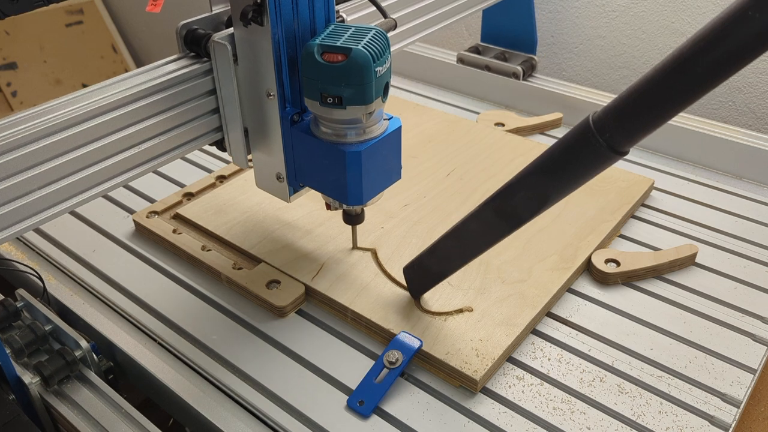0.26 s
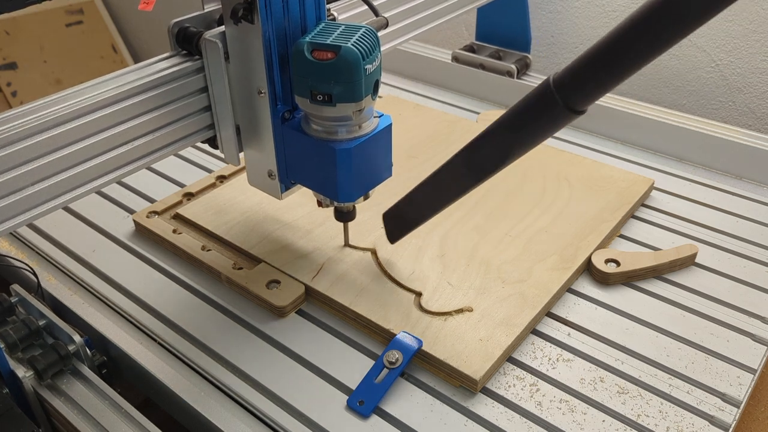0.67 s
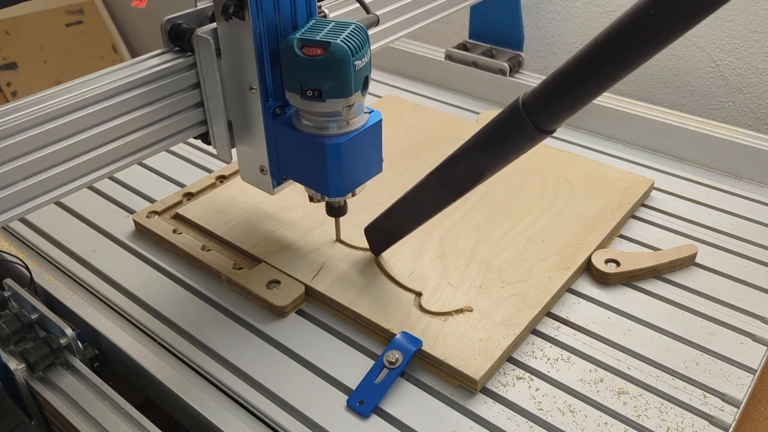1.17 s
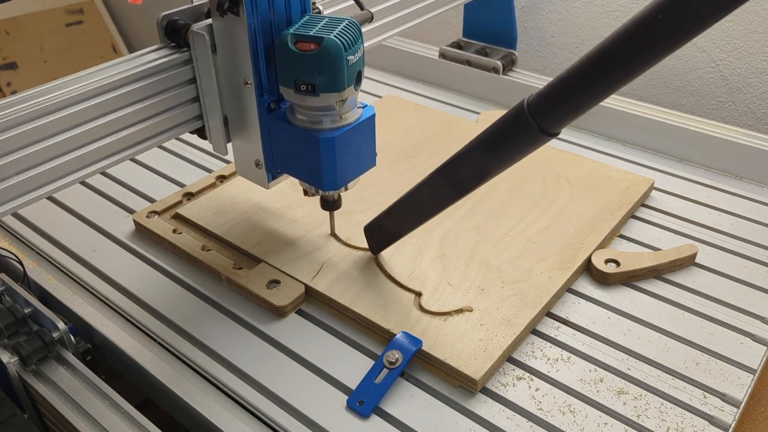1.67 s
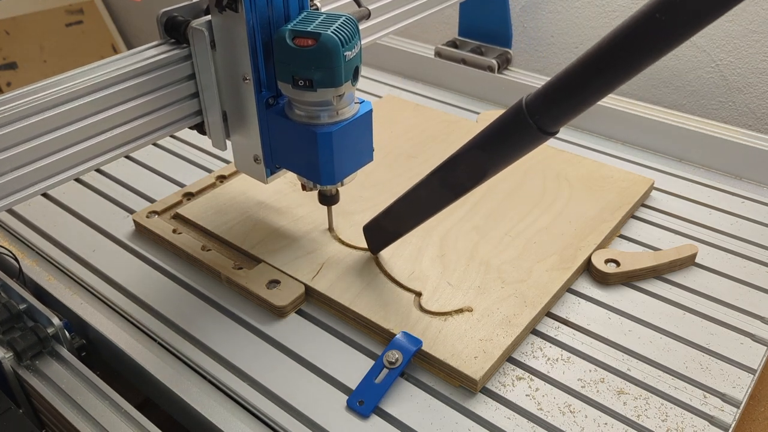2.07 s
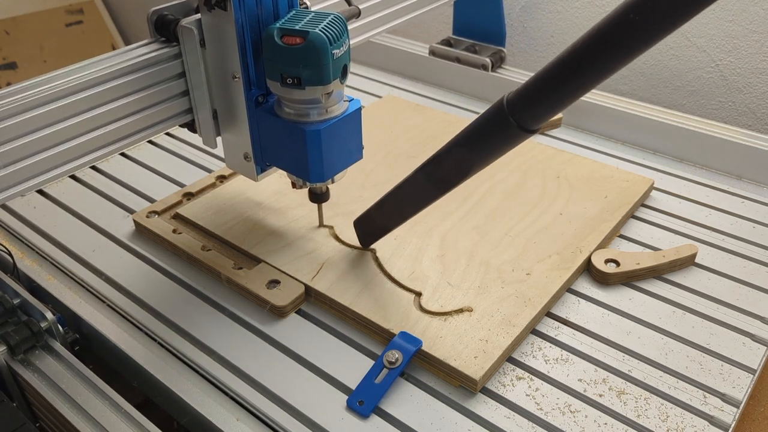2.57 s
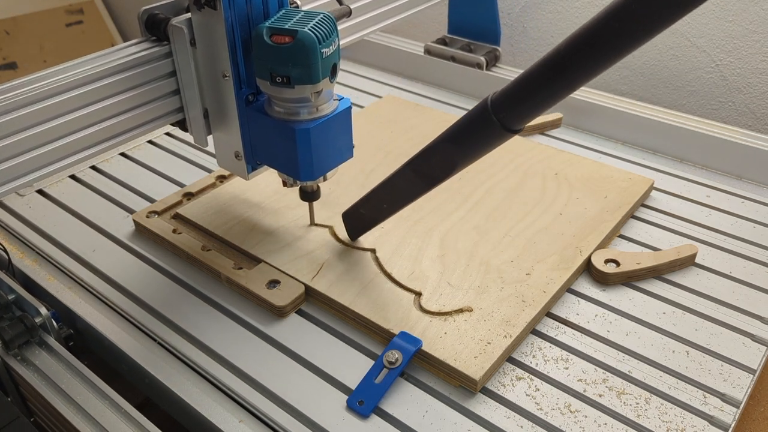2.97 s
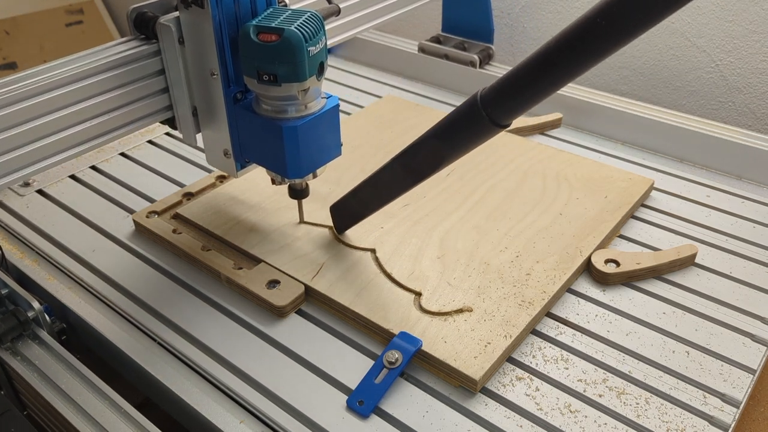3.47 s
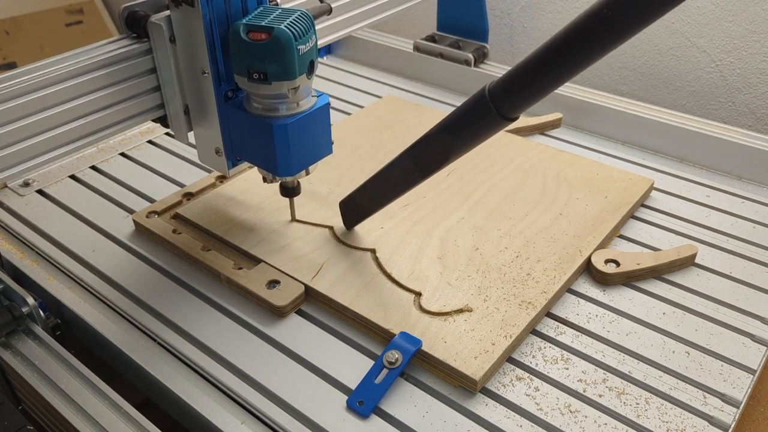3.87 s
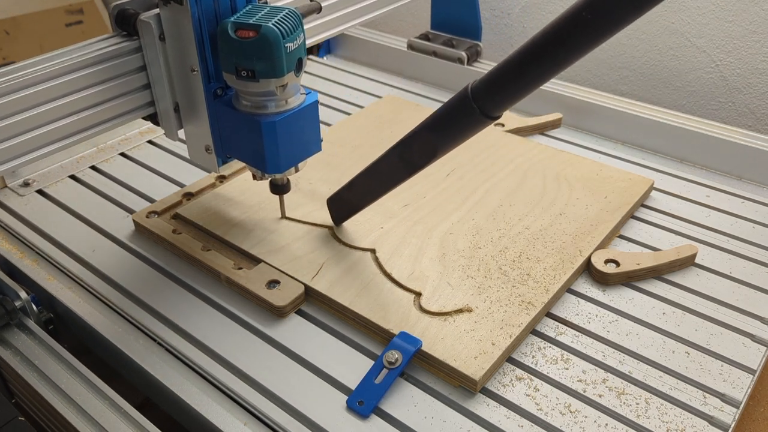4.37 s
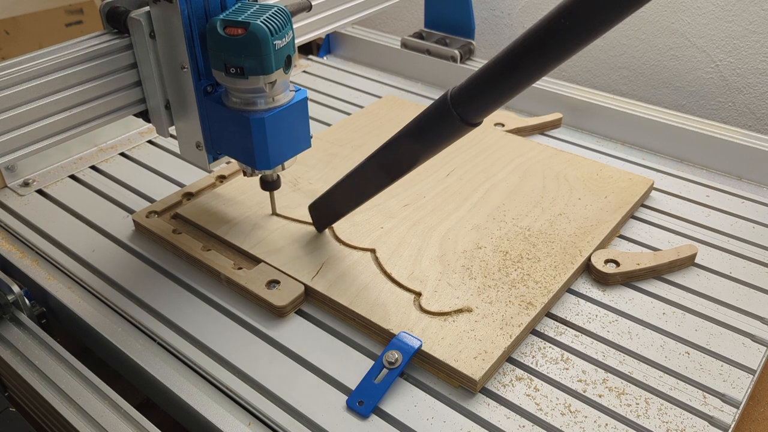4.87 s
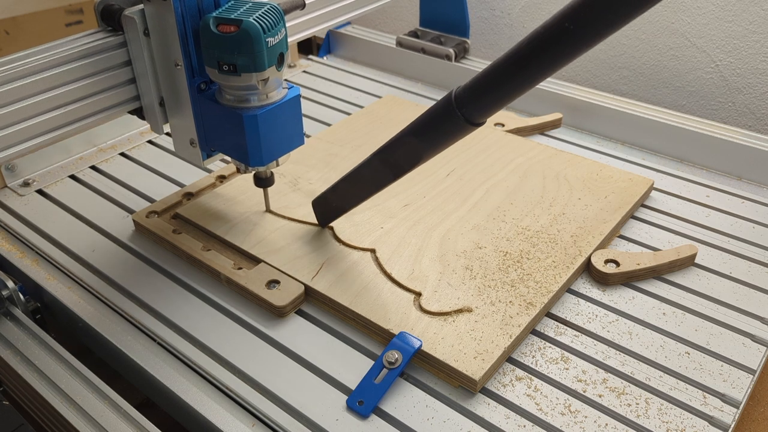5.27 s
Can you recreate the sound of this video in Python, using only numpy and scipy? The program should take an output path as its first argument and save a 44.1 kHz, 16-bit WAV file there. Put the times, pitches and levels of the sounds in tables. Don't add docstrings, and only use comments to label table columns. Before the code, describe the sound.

Close, continuous milling noise: a piercing high bit whine over a buzzing cutter tone, airy suction hiss, gliding motor hum and roughness at a corner.

```python
import sys
import numpy as np
from scipy import signal
from scipy.fft import rfft, irfft, next_fast_len
from scipy.io import wavfile
from scipy.ndimage import uniform_filter1d, map_coordinates

SR = 44100
rng = np.random.default_rng(int(sys.argv[2]) if len(sys.argv) > 2 else 0)


def persist_wave(psi):
    counts = np.round(np.clip(psi, -1, 1) * 32767).astype(np.int16)
    wavfile.write(sys.argv[1], SR, np.atleast_2d(counts).T)


def decibels_to_gain(level_db):
    exponent = np.asarray(level_db, float) / 20
    return 10 ** exponent


N = 243873


def router():
    ring_hz, = curves(CHATTER_PITCH)
    grab_db = grabs()
    shudder, looseness = gantry_shudder()
    grain = np.array([wobble(350), wobble(350)])
    rate_hz = 966.6 - 0.008 * (5600 - ring_hz)
    flute = turning(rate_hz + 0.25 * wobble(30.1))
    left_db, right_db = (db + grab_db for db in curves(CHATTER_LEVEL))
    strong_db = 10 * np.log10((decibels_to_gain(2 * left_db) + decibels_to_gain(2 * right_db)) / 2)
    strikes = flute_strikes(flute, shudder, grain, grab_db)
    ring = turning(ring_hz + (65 + 130 * looseness) * shudder[0] + wobble(30))
    chatter = bit_chatter(ring, left_db, right_db, shudder, grain)
    mixed = mixing_tones(flute, ring, strong_db, shudder + 0.072 * grain)
    return strikes + chatter + mixed + chip_noise(flute, shudder) + bit_hiss(strong_db)


# level at start in dB, drift
# in dB per s, swing in dB, loudest moment in seconds, period in seconds.
STRIKE_LEVEL = [(-21, -1.13, 0.9, 3, 4), (-26.5, -1.08, 3, 2.45, 4.1), (-19.5, -2, 3, 2.3, 4.9),
                (-30, 0.96, 1.5, 1.73, 2.17)]
# balance at start in dB, drift in dB per s, swing in dB,
# most left moment in seconds, period in seconds.
STRIKE_PAN = [(6.5, -0.53, 3, 3.2, 3.6), (-4, 2.53, 6, 5.76, 5.9), (1.5, -3, -0.5, 3.85, 1.85)]
# lead at start in rad, drift in rad per s, swing in rad,
# most ahead moment in seconds, period in seconds.
STRIKE_LEAD = [(-0.76, 0.33, 0.76, 3, 4.5), (-2.14, -0.15, 0.12, 4.3, 2.85),
               (-1.72, -0.23, 0.18, 0.97, 1.9)]
# level in dB, left-right in dB, left lead in rad,
# loudest moment in seconds, period in seconds.
UPPER_ORDERS = [(-40, -2.6, -.4, 1.5, 3.6), (-32.5, -1.7, 1.6, 1.75, 3.3), (-40, 2.7, 2.5, 4.1, 11),
                (-32.5, 2.1, 2, 1.45, 3.2), (-53.3, 7, 3, 1.6, 4.5), (-37.5, -.7, -1.9, 1.8, 5),
                (-43.3, 4.4, 3.1, 2.1, 5), (-36.6, 2.8, -1.1, 4, 7), (-41, 6.6, 2.6, 2.05, 4.5),
                (-40, 1.7, 0, 1.3, 3), (-46.5, 4.9, -.2, 1.45, 4), (-48.2, .7, -.1, 1.8, 2.6)]


def flute_strikes(flute, shudder, grain, grab_db):
    order_db = [slide(*row) for row in STRIKE_LEVEL]
    order_db[1] = order_db[1] - 1.1 * grab_db
    tones = shaken(flute, order_db[0], -0.47, 0, 0.25 * shudder + 0.098 * grain)
    shudder_share = [1.05, .55, .3]
    for k, share in enumerate(shudder_share):
        level_db = order_db[k + 1] + 0.74 * wobble(8.9)
        pan_db, lead = slide(*STRIKE_PAN[k]), slide(*STRIKE_LEAD[k])
        tones = tones + shaken((k + 2) * flute, level_db, pan_db, lead, share * shudder + 0.1 * grain)
    return tones + family(range(5, 17), UPPER_ORDERS, flute, 0, 0, shudder + 0.072 * grain)


# time in seconds, left level in dB, right level in dB.
CHATTER_LEVEL = [(0, -27, -18), (.4, -23.5, -16.5), (.62, -19, -17), (.92, -17.5, -21), (1.08, -24, -17.5),
                 (1.35, -22, -17.5), (1.47, -33, -19), (1.75, -42, -20), (2.15, -29, -22),
                 (2.7, -20.5, -21), (2.9, -23, -17), (3.15, -18.5, -19.5), (3.7, -19, -18.5),
                 (4.1, -21, -15.5), (4.7, -34, -15), (5.1, -41, -13), (5.25, -22, -16), (5.53, -22.5, -22)]
# time in seconds, pitch in Hz.
CHATTER_PITCH = [(0, 5597), (.45, 5613), (.92, 5610), (1.1, 5598), (1.36, 5595), (1.46, 5512), (2.1, 5535),
                 (2.5, 5565), (2.8, 5562), (3.15, 5582), (4.1, 5592), (5.53, 5595)]


def bit_chatter(ring, left_db, right_db, shudder, grain):
    turned = np.clip((np.arange(N) / SR - 1.73) / .4 + .5, 0, 1)
    lead = .2 + (4.15 - .2) * turned
    tremor = 1.15 * shudder + 0.11 * grain
    return shaken(ring, (left_db + right_db) / 2 - .6, left_db - right_db, lead, tremor)


# level in dB under the chatter,
# left-right in dB, left lead in rad, loudest moment in seconds, period in seconds.
CHATTER_SIDEBANDS = [(-17.5, -6, 0.84, 0.76, 7.4), (-24, 1.3, -3.5, .45, 7.8), (-17.5, 5, -1.5, 1.4, 6.5),
                     (-12, -1, 4.5, 1.3, 5.1), (-11, 2, 1, 3.5, 4.6), (-14.5, 2.5, -1.54, 0.16, 4.27),
                     (-15, 3, 4, 3.86, 4.8), (-21, 6, 1.5, 1.65, 2.5), (-39, 5.5, -0.5, 2.6, 2),
                     (-13, 3, 2.5, 0.65, 4.1), (-21, 8.6, 6, 1.1, 4.5), (-37.4, 3.3, -6, .95, 6),
                     (-15, 8.7, -3, 1.9, 3.3)]
# level in dB, left-right in dB,
# left lead in rad, loudest moment in seconds, period in seconds.
DOUBLED_SIDEBANDS = [(-44, 6, -6, 1.5, 4.5), (-26.6, -11, 5, .1, 3), (-33, 0, -1.5, 1.05, 4),
                     (-36, 1, -1, 10.3, 11), (-14.5, 5, -1.5, 1.8, 5.3), (-19, -8, 3.5, 1.3, 7)]


def mixing_tones(flute, ring, strong_db, tremor):
    gain_db = -0.56
    orders = [-3, -2, -1, *range(1, 11)]
    around = family(orders, CHATTER_SIDEBANDS, flute, ring, strong_db + gain_db, tremor)
    doubled_db = 2 * strong_db + 20 + gain_db
    return around + family(range(-2, 4), DOUBLED_SIDEBANDS, flute, 2 * ring, doubled_db, tremor)


# middle in seconds, level change in dB, half length in seconds.
CORNER_GRABS = [
    (2.17, -4, .025),
    (2.235, 6, .025),
    (2.4, -4, .11),
    (2.53, 6, .025),
    (2.6, -4, .025),
    (2.66, 4, .015),
    (2.71, -4, .025),
]


def grabs():
    return sum(db * bump(s, half_s) for s, db, half_s in CORNER_GRABS)


# time in seconds, rate in Hz, regular share 0-1, depth on flute orders 0-1.
GANTRY_SHAKE = [(0, 30, .4, .16), (.35, 30, .4, .12), (.45, 30, .3, .04), (1.35, 30, .3, .06),
                (1.5, 30, .4, .15), (1.85, 30, .3, .24), (2.7, 29, .4, .3), (2.95, 30, .85, .34),
                (3.4, 30.5, .9, .32), (3.75, 34, .97, .3), (4.13, 34.5, .97, .28), (4.2, 34, .6, .05),
                (5.53, 34, .5, .04)]


def gantry_shudder():
    shake_hz, regular, depth = curves(GANTRY_SHAKE)
    regular = np.clip(regular, 0, 1)
    beat = turning(shake_hz + wobble(4.7))
    shake = np.array([np.sqrt(2 * regular) * wave(beat) + np.sqrt(1 - regular) * wobble(45)
                      for wave in (np.sin, np.cos)])
    return depth * shake, 1 - regular


# frequency in Hz, level in dB per Hz.
CHIP_COLOUR = [(300, -48), (900, -1.5), (2000, -3), (4300, 7), (5600, 2.5), (9000, -3), (13000, 0),
               (16000, -6.5)]
# time in seconds, level in dB.
CHIP_LEVEL = [
    (0.0, -29.5),
    (0.61, -53),
    (1.91, -29.5),
    (5.14, -39),
    (5.53, -32.5),
]


def chip_noise(flute, shudder):
    chips = stereo_noise(lambda hz: decibels_to_gain(along(CHIP_COLOUR, hz)), patchy_db=2.0)
    chips = chips * (1 + 0.34 * np.sin(flute)) * (1 + 1.3 * shudder[0])
    return decibels_to_gain(curves(CHIP_LEVEL)[0] + 10) * chips


def bit_hiss(strong_db):
    centre_hz, width_hz = 5550, 420
    resonance = lambda hz: 1 / (1 + ((hz - centre_hz) / width_hz) ** 2)
    return decibels_to_gain(strong_db - 13) * stereo_noise(resonance, patchy_db=2)


# time in seconds, pitch in Hz, level in dB.
FIRST_AXIS = [(0, 242.7, -51), (.2, 255, -34), (.45, 262, -55), (.65, 265, -39), (1, 266.8, -48.5),
              (1.45, 250.2, -37), (1.7, 236.8, -42), (1.95, 215, -38), (2.15, 178, -49)]
SECOND_AXIS = [(2.15, 238.7, -43), (2.499, 244.4, -40.5), (3, 249, -35.5), (3.6, 255.9, -35.5),
               (4, 259, -43), (4.5, 261.6, -41.5), (4.8, 264.7, -49), (5.53, 265.5, -52)]
RISING_AXIS = [
    (1.65, 245, -56),
    (1.9, 295, -49),
    (2.15, 350, -52),
]


def steppers():
    t, out = np.arange(N) / SR, 0
    for rows in (FIRST_AXIS, SECOND_AXIS, RISING_AXIS):
        hz, db = curves(rows)
        on = np.clip(np.minimum(t - rows[0][0], rows[-1][0] - t) / 0.043 + .5, 0, 1)
        hum = pair(turning(hz), db + 1.4 * wobble(12), 2.5, 0)
        octave = pair(2 * turning(hz), db - 18, 0, 0)
        microsteps = pair(16 * turning(hz), -44 + 3 * wobble(3), -1.5, 1.5)
        out = out + on * (hum + octave + microsteps)
    return out


# frequency in Hz, level in dB per Hz.
HOSE_COLOUR = [(20, -55), (60, -37), (80, -20), (110, -4.5), (420, -10.5), (800, -2.5), (1150, -5),
               (2000, -3), (3300, 5.5), (3550, 5), (5000, -4.5), (7000, 1.5), (10500, -4.5), (13000, 1),
               (16000, -4.5)]
# time in seconds, level in dB.
HOSE_LEVEL = [
    (0.0, -25),
    (1.56, -21.5),
    (2.97, -24.5),
    (3.22, -23.5),
    (5.53, -24.5),
]


def hose_rush():
    level_db = curves(HOSE_LEVEL)[0] + 4.5 + 0.43 * wobble(14)
    return decibels_to_gain(level_db) * stereo_noise(lambda hz: decibels_to_gain(along(HOSE_COLOUR, hz)), patchy_db=1.5)


# pitch in Hz, level in dB.
MOTOR_LINE = (1023, -42)


def vacuum_motor():
    hz, db = MOTOR_LINE
    return pair(turning(hz + 0.64 * wobble(9.1)), db + 0.78 * wobble(5.0), 0, 0)


# frequency in Hz, width in Hz, level in dB.
ROOM_MODES = [(141, 15.5, 0.5), (178, 12.7, 4), (202.4, 21, 2.5), (248, 45, -6), (349, 22, -7.5)]
# time in seconds, rise in dB.
RUMBLE_SURGES = [(.28, 12.5), (1.44, 14), (2.2, 8), (3.47, 13), (3.75, 11), (4.89, 13.5), (5.03, 6),
                 (5.31, 6)]


def room_rumble():
    modes = lambda f: np.sqrt(sum(decibels_to_gain(2 * db) / (1 + (2 * (f - c) / w) ** 2) ** 2 for c, w, db in ROOM_MODES))
    surge_db = sum(db * bump(s, 0.046) for s, db in RUMBLE_SURGES)
    drone = pair(turning(101 + 2.43 * wobble(8)), -50.5 + surge_db + 3 * wobble(7), -.5, 0)
    return decibels_to_gain(-39) * stereo_noise(modes, patchy_db=0.0) + drone


# frequency in Hz, correlation -1 to 1.
LIKENESS = [(60, 0.39), (130, 1), (400, 0.8), (900, 0.78), (2000, 0.71), (2800, -0.11), (4000, -0.1),
            (15000, -0.0022)]
# frequency in Hz, left-right in dB.
NOISE_LEAN = [(100, 0.5), (2000, 0.5), (5000, -2.5), (10500, 1), (12500, 6), (16000, 6)]


def stereo_noise(gain, patchy_db):
    z = signal.stft(rng.standard_normal((2, N)), nperseg=512)[2]
    room_ripple_db = 2.2 * patches(z.shape[1:], 2, 250)
    field_db = patchy_db * patches(z.shape[1:], 5, 12) + room_ripple_db
    two = signal.istft(z * decibels_to_gain(field_db), nperseg=512)[1][:, :N]
    turn = lambda hz: np.arccos(np.clip(along(LIKENESS, hz), -1, 1)) / 2
    mid, side = filtered(two, lambda hz: gain(hz) * [np.cos(turn(hz)), np.sin(turn(hz))])
    lean = lambda hz: decibels_to_gain(along(NOISE_LEAN, hz) * [[.5], [-.5]])
    return unit(filtered(np.array([mid + side, mid - side]), lean))


def family(orders, rows, flute, carrier, base_db, tremor):
    out = 0
    for order, (db, pan_db, lead, top_s, period) in zip(orders, rows):
        apart = 0.043 * period * rng.standard_normal()
        left_db, right_db = (slide(0, 0, 4.5, top_s + way * apart, period) for way in (1, -1))
        level_db = base_db + db + (left_db + right_db) / 2 + 1.1 * wobble(5.5)
        balance_db = pan_db + left_db - right_db + 1.7 * wobble(2.67)
        phase = carrier + order * flute + rng.uniform(0, 2 * np.pi)
        out = out + shaken(phase, level_db, balance_db, lead + 0.35 * wobble(1.32), tremor)
    return out


def shaken(phase, db, pan_db, lead, tremor):
    angle = rng.uniform(0, 2 * np.pi) + np.array([[0], [rng.normal(0, 1.0)]])
    size = 1 + np.cos(angle) * tremor[0] + np.sin(angle) * tremor[1]
    twist = 0.53 * (np.cos(angle) * tremor[1] - np.sin(angle) * tremor[0])
    left_right = np.array([[.5], [-.5]])
    level = np.sqrt(2) * size * decibels_to_gain(db + left_right * pan_db)
    return level * np.sin(phase + twist + left_right * lead)


def pair(phase, db, pan_db, lead):
    left = decibels_to_gain(db + pan_db / 2) * np.sin(phase + lead / 2)
    right = decibels_to_gain(db - pan_db / 2) * np.sin(phase - lead / 2)
    return np.sqrt(2) * np.array([left, right])


def unit(x):
    return x / np.sqrt(np.mean(x ** 2) + 1e-20)


def along(points, hz):
    f, v = np.transpose(points)
    return np.interp(np.log(hz + 1), np.log(f + 1), v)


def curves(rows):
    s, *cols = np.transpose(rows)
    return [np.interp(np.arange(N) / SR, s, c) for c in cols]


def wobble(rate):
    knots = rng.standard_normal(int(N * rate / SR) + 4)
    return map_coordinates(knots, [np.arange(N) * rate / SR])


def turning(hz):
    return 2 * np.pi * np.cumsum(hz) / SR * np.ones(N) if np.ndim(hz) == 0 else 2 * np.pi * np.cumsum(hz) / SR


def filtered(x, response):
    m = next_fast_len(N + 8192)
    return irfft(rfft(x, m) * response(np.fft.rfftfreq(m, 1 / SR)), m)[..., :N]


def patches(shape, bins, frames):
    smooth = uniform_filter1d(rng.standard_normal(shape), bins, axis=0)
    return unit(uniform_filter1d(smooth, frames, axis=1))


def slide(start, per_s, swing, top_s, period_s):
    t = np.arange(N) / SR
    return start + per_s * t + swing * np.cos(2 * np.pi * (t - top_s) / period_s)


def bump(s, half_s):
    return np.exp(-((np.arange(N) / SR - s) / half_s) ** 2)


def scene():
    return router() + steppers() + hose_rush() + vacuum_motor() + room_rumble()


def band_limit(x):
    return signal.sosfilt(signal.butter(12, 15750, fs=SR, output="sos"), x)


# centre in Hz, width in Hz, share removed 0-1.
SPECTRUM_HOLLOWS = [(1150, 80, .7), (3500, 150, .85), (4360, 120, .5), (6260, 70, .4)]
# centre in Hz, half width in Hz, leak 0-1.
PORT_NOTCH = (8220, 150, .06)


def record(dry):
    centre_hz, half_hz, leak = PORT_NOTCH

    def microphone(hz):
        hollows = np.prod([1 - share / (1 + ((hz - c) / w) ** 2) for c, w, share in SPECTRUM_HOLLOWS], axis=0)
        off = (hz - centre_hz) ** 2
        notch = np.sqrt((off + (half_hz * leak) ** 2) / (off + half_hz ** 2))
        return hollows * notch * (hz < 15750)

    mix = filtered(dry, microphone)
    return band_limit(mix)


dry = scene()
out = record(dry)
persist_wave(out)
```